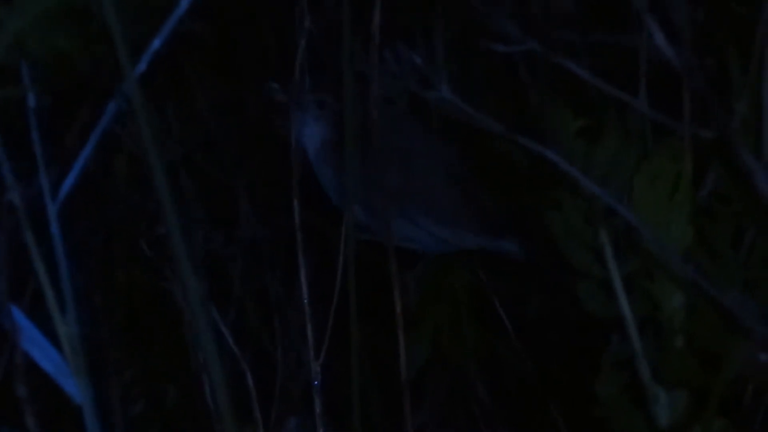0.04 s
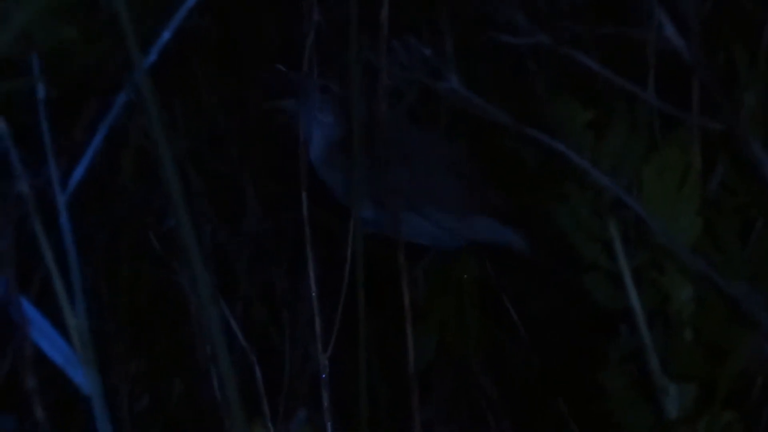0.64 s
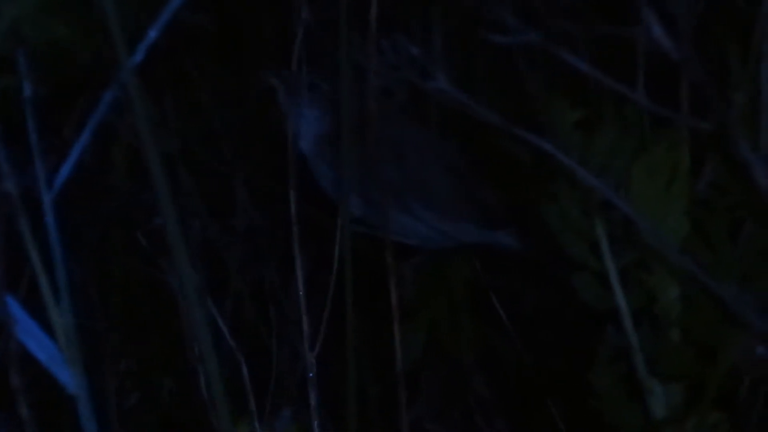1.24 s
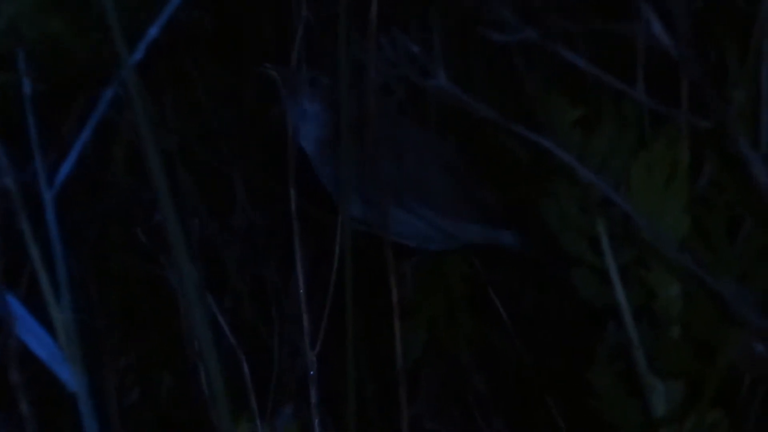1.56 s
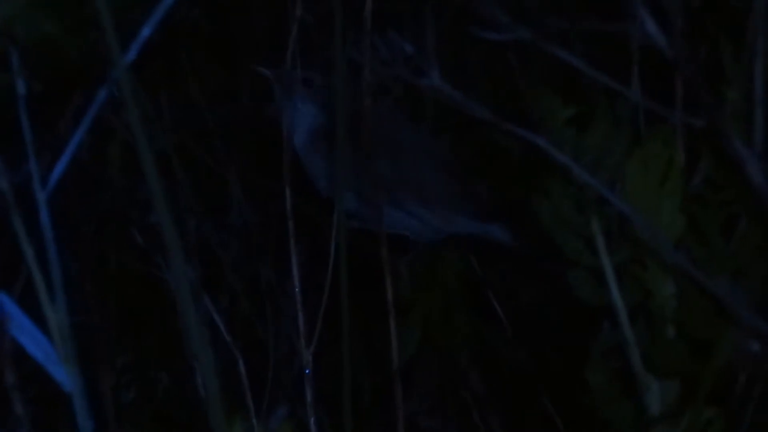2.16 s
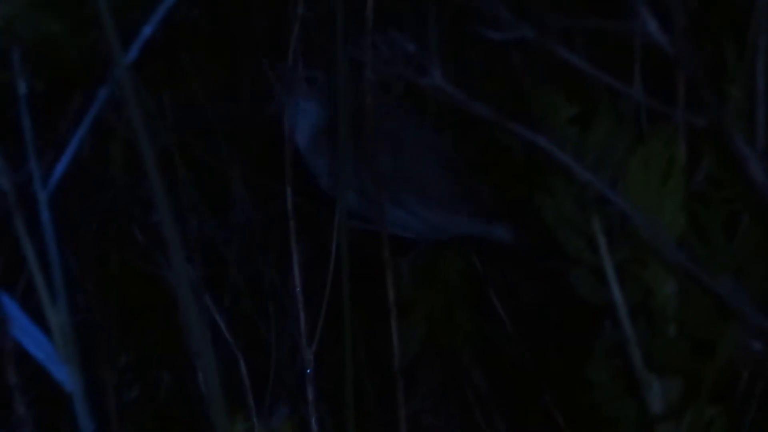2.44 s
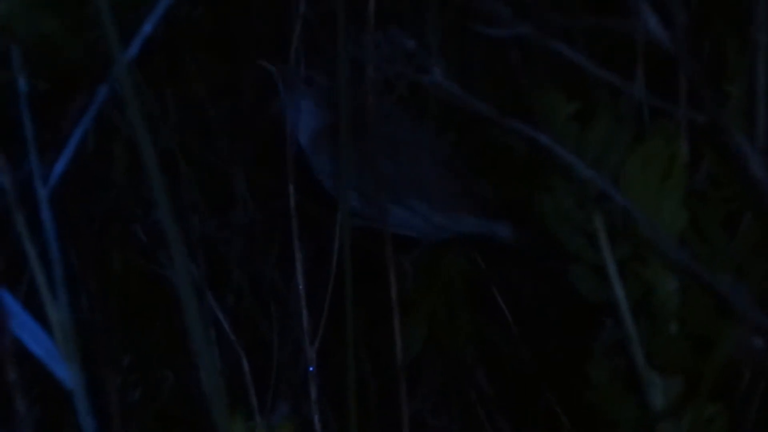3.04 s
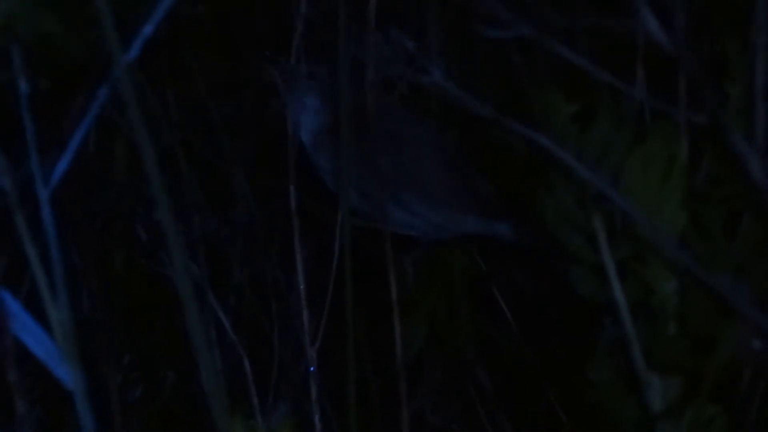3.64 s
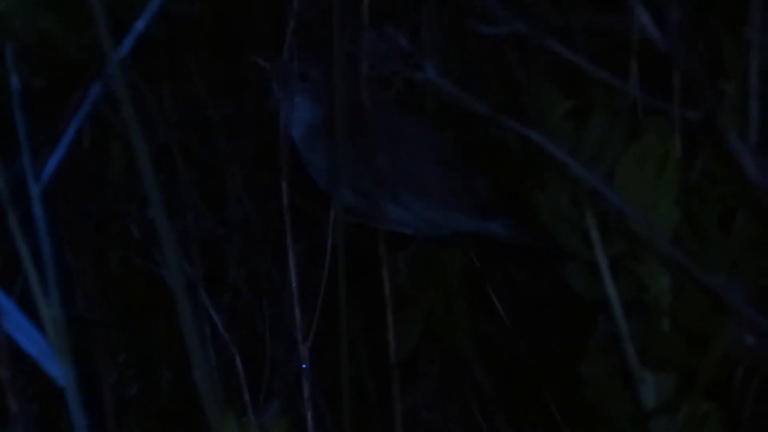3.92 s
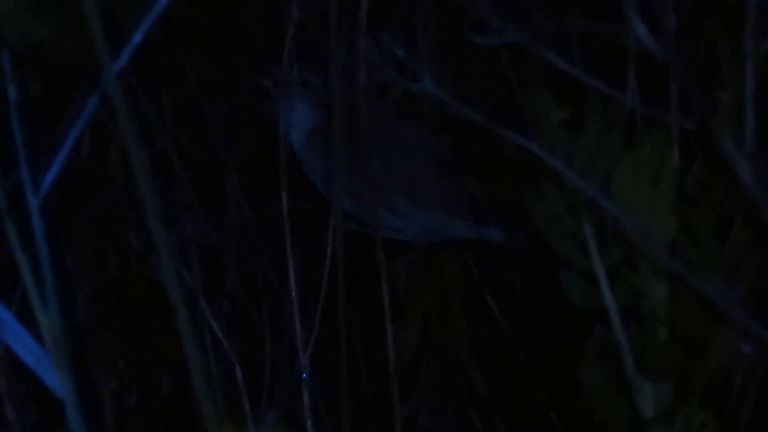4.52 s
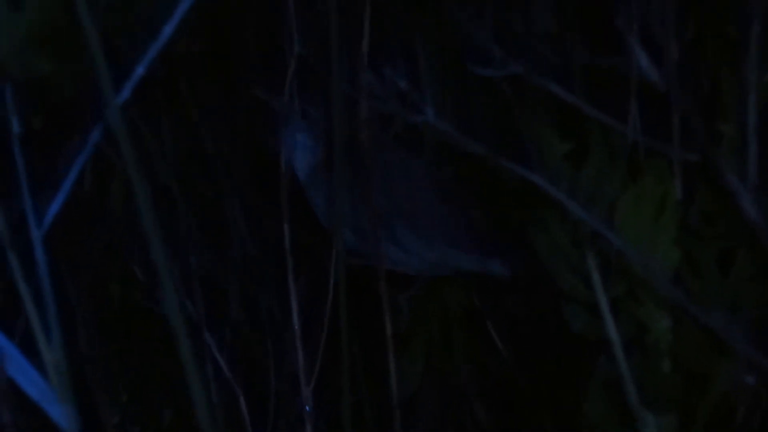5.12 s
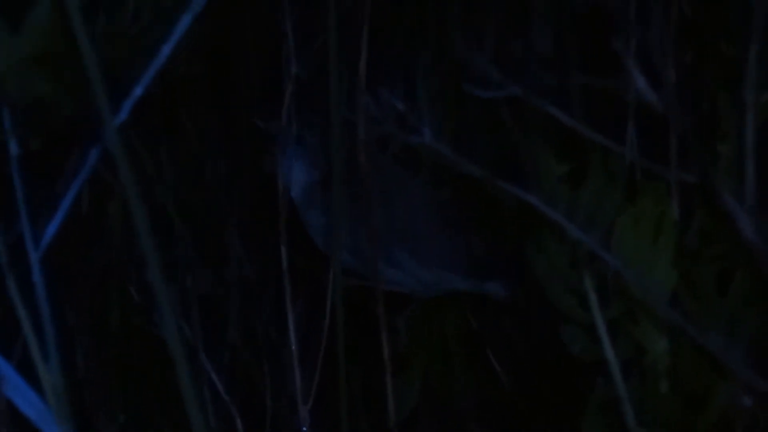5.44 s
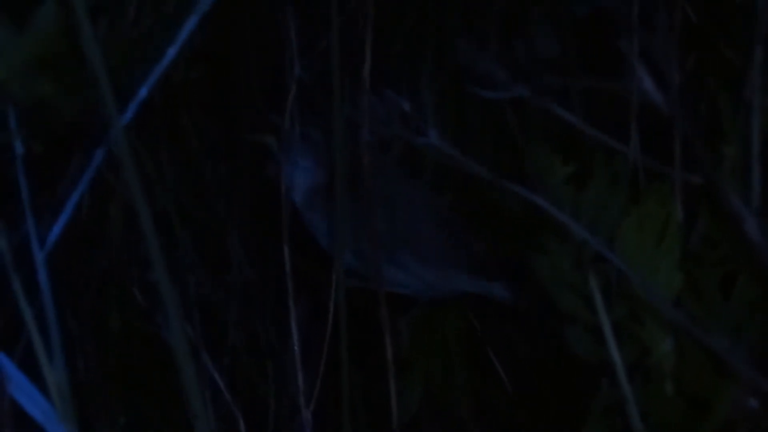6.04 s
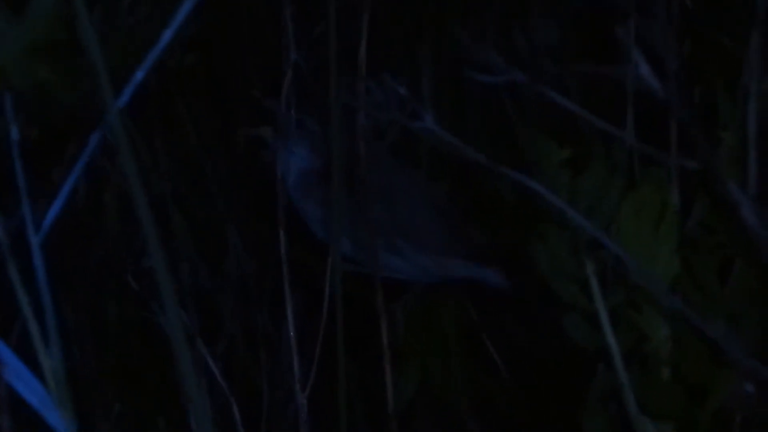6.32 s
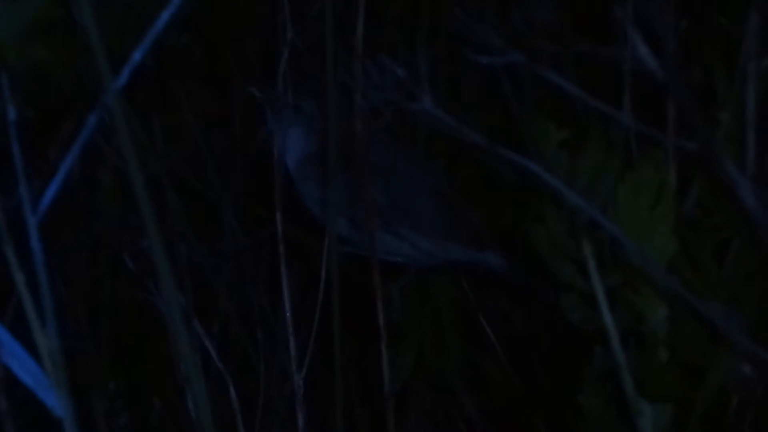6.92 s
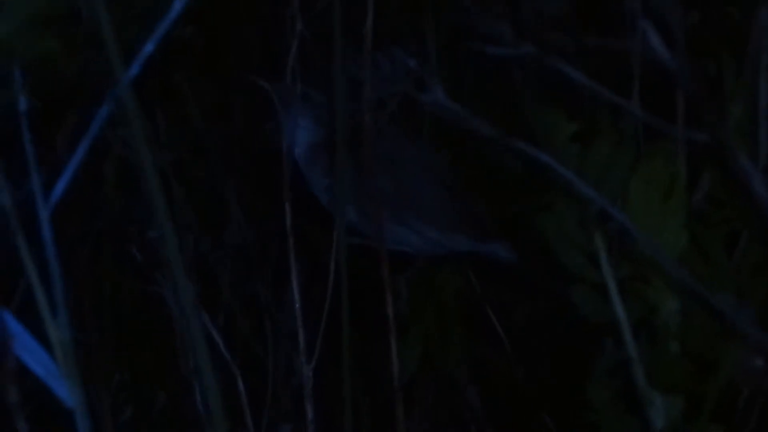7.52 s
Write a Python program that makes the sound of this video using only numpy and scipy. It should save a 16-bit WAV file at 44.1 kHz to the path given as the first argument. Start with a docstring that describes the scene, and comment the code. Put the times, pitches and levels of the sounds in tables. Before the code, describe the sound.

A small warbler sings close and centred in a reed bed at night. It opens with two slow rising whistles and short falling trills, then repeats bright chirps in quick groups of three. Between the groups come sets of three dry chucks and, twice, a harsh rising buzz ending in a sharp tack. The reeds add a slight echo, over faint rumbling air and far traffic.

```python
"""A reed bed at night, with a warbler singing close by. Its syrinx glides through rising whistles,
flutters into trilled slurs and harsh rising buzzes that end in a sharp tack, beats its two sides
together for chirps in threes, and pulses out dry chucks. The stems scatter a faint echo.
Far traffic rumbles and swells behind, under night air and a few thin steady tones."""
import sys
import numpy as np
from scipy import signal
from scipy.fft import rfft, irfft, next_fast_len
from scipy.io import wavfile
from scipy.ndimage import map_coordinates

SR = 44100
rng = np.random.default_rng(int(sys.argv[2]) if len(sys.argv) > 2 else 0)


def waveform_to_disk(signal):
    """Save audio, clipped to [-1, 1], as 16-bit WAV at the path in sys.argv[1]."""
    frames = np.transpose(np.atleast_2d(signal))
    scaled = np.clip(frames, -1, 1) * 32767
    samples = np.round(scaled).astype(np.int16)
    wavfile.write(sys.argv[1], SR, samples)


N = 342657


# Bright, scraping rasp: freq_hz, level_db
SCRAPE_SPECTRUM = [(1200, -41.5), (2000, -10), (2900, -6.5), (3800, -7), (5200, 3.5), (6100, -3.5),
                   (6800, -8.5), (7700, -28.5), (10700, -27.5), (12000, -35)]
# Hollow, throaty rasp: freq_hz, level_db
CLUCK_SPECTRUM = [(900, -29.5), (1600, -13.5), (2300, 5), (3100, -0.5), (3800, -12), (5000, -27),
                  (7000, -41.5), (11000, -42.5)]
# Thin, breathy fizz: freq_hz, level_db
FIZZ_SPECTRUM = [(2000, -22), (3000, -3), (5200, 5.5), (6200, -4.5), (7000, -3.5), (8500, -15.5),
                 (10500, 0.5), (12000, -19)]
# A whistle's fourth harmonic, relative to its fundamental: pitch_hz, level_db
FOURTH_HARMONIC = [(2200, -54.5), (2450, -54.5), (2620, -43.5), (2730, -53)]
# Slow rising whistles: start_s, length_s, plateau_hz, crest_hz, to_crest_s, climb_s, level_db
WHISTLES = [(0.106, 0.458, 1987, 2713, 0.425, 0.11, -16.5), (1.501, 0.4494, 1988, 2720, .42, 0.085, -16.5)]

def whistles(scoop_hz=789, scoop_s=.044, throat_hz=3535, throat_width_hz=330, waver_db=2):
    """The throat passes 2.5-4 kHz: the octave leads, then the fundamental takes over as pitch climbs."""
    out = np.zeros(N)
    for start, length, plateau_hz, crest_hz, crest_s, climb_s, db in WHISTLES:
        t = clock(length)
        n = len(t)
        climb = np.exp(-abs((t - crest_s) / climb_s) ** 1.7)
        hz = plateau_hz - scoop_hz * np.exp(-t / scoop_s) + (crest_hz - plateau_hz) * climb
        unsettled = np.exp(-t / .075)  # the note creaks before it turns pure
        phase = turns(hz * (1 + (.0045 + .018 * unsettled) * wobble(n, 220)))
        handover, octave_fade = ramp(t, .14, .32), ramp(t, .16, .39)
        first_db = db - 15.5 * (1 - handover) + 6.5 * (climb - 1)
        throat_db = 8 * hump(2 * hz - throat_hz, throat_width_hz)  # the octave crosses a resonance
        octave_db = db - 20 - 28 * octave_fade + throat_db
        creak_db = 21.5 * hump(t - .021, .01)  # upper harmonics flare on the attack
        third_db = octave_db - 30.5 + creak_db
        fourth_db = np.maximum(first_db + along(FOURTH_HARMONIC, hz), octave_db - 51.5 + 1.87 * creak_db)
        fifth_db = np.maximum(octave_db - 42, db - 58.5 - 25 * climb)
        overtones_db = [level + waver_db * wobble(n, 80)
                        for level in (octave_db, third_db, fourth_db, fifth_db)]
        voice = envelope(t, .057, .016) ** 2 * tone(phase, [first_db + .5 * wobble(n, 82)])
        voice += envelope(t, .029, .04) * tone(phase, [-np.inf] + overtones_db)
        scrape = amp(db - 27) * spike(t - .018, .019, .0087) * noise(SCRAPE_SPECTRUM)[:n]
        rasp = amp(db - 34) * spike(t - .035, .014, .16) * noise(CLUCK_SPECTRUM)[:n]
        closing_wisp = amp(-56 - 1200 * abs(t - length + .007)) * noise(FIZZ_SPECTRUM)[:n]
        add(out, start, voice + scrape + rasp + closing_wisp)
    return out


# Crisp hiss on chirps and tacks: freq_hz, level_db
HISS_SPECTRUM = [(900, -47), (1700, -20), (2400, -8.5), (4000, 3), (5900, -1.5), (6800, -3), (8000, -16),
                 (10700, -23.5), (12000, -38.5)]
# Runs of arching chirps: start_s, to_crest_s, length_s, crest_hz, level_db
CHIRPS = [(1.028, 0.0068, 0.051, 4160, -19.5), (1.115, 0.007, 0.049, 4193, -14.5),
          (1.207, 0.0069, 0.044, 4120, -14), (2.707, 0.013, 0.052, 4166, -17),
          (2.803, 0.014, 0.055, 4192, -15), (2.905, 0.011, 0.057, 4163, -14.5),
          (3.648, 0.0094, 0.056, 4153, -16), (3.734, .015, 0.06, 4218, -14.5),
          (3.832, .014, 0.059, 4210, -14.5), (4.551, 0.01, 0.058, 4220, -15),
          (4.642, 0.016, 0.063, 4252, -14.5), (4.74, 0.011, 0.053, 4202, -13.5),
          (5.556, 0.012, 0.054, 4004, -15.5), (5.642, .015, 0.059, 4270, -14.5),
          (5.739, 0.016, 0.063, 4195, -14.5), (6.605, 0.012, 0.06, 4148, -16),
          (6.695, 0.015, 0.06, 4240, -15), (6.789, 0.014, 0.06, 4232, -14), (7.58, 0.011, 0.057, 4054, -15),
          (7.668, 0.016, 0.063, 4205, -15)]

def chirps(arch_depth=.225, rise_s=.008, fall_s=.018, partner_ratio=.83, upturn=.032, rough=.042):
    """A clean upward arch falls and roughens as the other side of the syrinx beats against it."""
    out = np.zeros(N)
    for start, crest_s, length, hz, db in CHIRPS:
        t = clock(length)
        n, progress = len(t), t / length
        arch = 1 - arch_depth * (1 - hump(t - crest_s, np.where(t < crest_s, rise_s, fall_s)))
        joined, ending = ramp(progress, .32, .59), ramp(progress, .72, .99)
        lead = amp(-1) * ramp(progress, 0, .41) * (1 - ramp(progress, .53, .87))
        partner = amp(-5) * joined * (1 - .93 * ending)
        lead_hz = hz * arch * (1 + rough * (.09 + joined) * wobble(n, 600))
        partner_hz = hz * (partner_ratio + upturn * ending) * (1 + .024 * wobble(n, 380))
        voice = lead * tone(turns(lead_hz), [0, -42 + 3 * wobble(n, 460), -59])
        voice += partner * tone(turns(partner_hz), [.5 * wobble(n, 350), -37, -49])
        fizz = np.maximum(lead, partner) * amp(-41.5 + 3.2 * joined) * noise(FIZZ_SPECTRUM)[:n]
        opening = amp(-31 - 510 * abs(t - .004)) * noise(HISS_SPECTRUM)[:n]
        add(out, start, amp(db) * (voice + fizz + opening))
    return out


def trill(hz, gain, rasp, rate_hz, swing_hz, cusp, throb_db, lag_rad,
          jitter, wander, rough, grit, blur_hz):
    """A fast, uneven flutter of the syrinx swings pitch and loudness together and chops the rasp."""
    n = len(hz)
    cycle = turns(rate_hz * (1 + jitter * wobble(n, 260)))
    depth = 1 + .13 * wobble(n, rate_hz)
    flutter = depth * (np.sin(cycle) + cusp * np.cos(2 * cycle))  # cusp > 0: round crests, sharp dips
    pitch = hz * (1 + wander * wobble(n, 330)) + swing_hz * flutter
    throb = unit(amp(throb_db * np.sin(cycle - lag_rad) + .8 * wobble(n, 300)))  # peaks on the way down
    hoarse = (rough * np.minimum(rasp, gain) + grit * gain) * (1 - .5 * np.sin(cycle))  # most in the dips
    croak = hoarse * wobble(n, 1300) * tone(turns(.9 * pitch), [0])  # a noisy band just under the tone
    octave = tone(2 * turns(pitch + blur_hz * wobble(n, 2200)), [-32])
    voice = gain * (tone(turns(pitch), [0]) + octave)
    return throb * (voice + croak + rasp * noise(SCRAPE_SPECTRUM)[:n])


# Trilled falling slurs: start_s, length_s, start_pitch_hz, level_db
SLURS = [(0.619, .082, 5214, -17), (2.012, 0.081, 5250, -16.5), (2.381, 0.079, 5440, -17.5)]

def slurs(sag_hz_per_s=10500):
    """A trill that opens with a puff of rasp, swells and sags in pitch."""
    out = np.zeros(N)
    for start, length, hz, db in SLURS:
        t = clock(length)
        gain = envelope(t, attack_s=.032, release_s=.023)
        rasp = amp(-22) * hump(t - .005, .0085) + amp(-46) * gain
        slur = trill(hz - sag_hz_per_s * t, gain, rasp, rate_hz=191, swing_hz=370, cusp=.1, throb_db=2.4,
                     lag_rad=1.1, jitter=.013, wander=.014, rough=.2, grit=.015, blur_hz=90.3)
        add(out, start, amp(db) * slur)
    return out


# Two coughs of rasp that open each buzz: offset_s, relative_db
BUZZ_COUGHS = [(.01, -6), (.032, -9.5)]
# Harsh rising buzzes: start_s, length_s, start_pitch_hz, level_db
BUZZES = [(4.022, 0.2734, 3915, -20), (6.026, 0.2802, 3893, -19.5)]

def buzzes(hold_s=.07, rise_hz_per_s=7530, swell_db_per_s=48, full_s=.19, clearing_s=.15):
    """A trill that starts as rasp and grows higher, louder and clearer."""
    out = np.zeros(N)
    for start, length, hz, db in BUZZES:
        t = clock(length)
        pitch = hz + rise_hz_per_s * np.maximum(t - hold_s, 0)
        swell = amp(swell_db_per_s * np.minimum(t - full_s, 0))
        gain = envelope(t, attack_s=.069, release_s=.03) * swell
        rasp = amp(-12) * hump(t, clearing_s) * ramp(t, 0, .01)
        rasp += sum(amp(cough_db) * hump(t - at, .0059) for at, cough_db in BUZZ_COUGHS)
        buzz = trill(pitch, gain, rasp, rate_hz=173, swing_hz=470, cusp=-.11, throb_db=2,
                     lag_rad=.38, jitter=.05, wander=.022, rough=1.1, grit=.027, blur_hz=222)
        add(out, start, amp(db) * buzz)
    return out


# The sharp tack that caps each buzz: start_s, pitch_hz, level_db
TACKS = [(4.356, 5980, -14.5), (6.3695, 5950, -14)]

def tacks(peak_s=.0035, decay_s=.0062, broken_s=.0052, rough=.055):
    """A tack starts pure and breaks into rasp."""
    out, t = np.zeros(N), clock(.035)
    n = len(t)
    broken = ramp(t, peak_s / 2, broken_s)
    for start, hz, db in TACKS:
        phase = turns(hz * (1 + rough * broken * wobble(n, 700)))
        voice = spike(t - peak_s, .0007, decay_s) * tone(phase, [-1, -41])
        rasp = amp(-8 + wobble(n, 601)) * broken * hump(t - .009, .011) * noise(HISS_SPECTRUM)[:n]
        add(out, start, amp(db) * (voice + rasp))
    return out


# A chuck's weak pulse and strong pulse: offset_s, pitch_ratio, relative_db
CHUCK_PULSES = [(-.0125, .83, -8), (0, 1, 1.5)]
# Dry chucks: centre_s, pitch_hz, level_db
CHUCKS = [(3.0955, 2700, -18), (3.285, 2380, -20), (3.465, 2390, -19), (4.9425, 2534, -19.5),
          (5.1409, 2410, -22.5), (5.365, 2505, -21), (7.0062, 2700, -19.5), (7.198, 2680, -22),
          (7.4035, 2660, -20)]

def chucks(fall_depth=.42, fall_s=.005, rough=.026):
    """Two falling pulses, each trailing a burst of rasp, inside a faint cloud of rasp."""
    out, t = np.zeros(N), clock(.07) - .035
    n = len(t)
    for centre, hz, db in CHUCKS:
        voice, rasp = np.zeros(n), amp(-18) * hump(t, .02)
        for at, ratio, pulse_db in CHUCK_PULSES:
            sweep = ratio * (1 - fall_depth * np.tanh((t - at) / fall_s))
            phase = turns(hz * sweep * (1 + rough * wobble(n, 700)))
            voice += spike(t - at, .0017, .0017) * tone(phase, [pulse_db, pulse_db - 39])
            rasp += amp(pulse_db - 4) * spike(t - at - .003, .0011, .0035)
        sputter = unit(amp(1.5 * wobble(n, 601)))
        add(out, centre + t[0], amp(db) * (voice + rasp * sputter * noise(CLUCK_SPECTRUM)[:n]))
    return out


# The reed bed's tail, shorter in the treble: freq_hz, t60_s
REED_DECAY = [(1500, 0.37), (2700, .3), (4500, 0.27), (10000, 0.22)]

def reed_bed(song, near_db=-18, near_t60_s=.09, far_db=-27, spread=.45):
    """Near stems scatter the song at once; the wider bed answers with a faint tail."""
    hz, t, spectra = signal.stft(rng.standard_normal((2, SR // 2)), SR, nperseg=256)
    far = signal.istft(spectra * amp(-60 * t / along(REED_DECAY, hz)[:, None]), SR, nperseg=256)[1]
    near = rng.standard_normal(far.shape) * amp(-60 * np.arange(far.shape[1]) / SR / near_t60_s)
    echo = amp(near_db) * near / np.linalg.norm(near[0]) + amp(far_db) * far / np.linalg.norm(far[0])
    delayed = np.pad(song, (80, 0))
    mid, side = signal.fftconvolve(delayed[None], echo, axes=1)[:, :N]
    return np.array([mid + spread * side, mid - spread * side])


# Distant tyre wash: freq_hz, level_db
TYRE_SPECTRUM = [(300, -31), (600, 0), (1050, 3), (1500, -3.5), (2300, -8), (3500, -40.5)]
# Swells of passing traffic: peak_s, half_length_s, level_db
TRAFFIC_SWELLS = [(1.096, .9, -53), (3.702, 0.6, -50), (4.392, 0.18, -47), (5.8, 0.94, -53.5),
                  (7.085, 0.31, -47)]

def far_traffic(murmur_db=-58):
    """Tyre noise swells over a steady murmur."""
    t = np.arange(N) / SR
    swell_power = sum(amp(db) ** 2 * hump(t - peak, width) for peak, width, db in TRAFFIC_SWELLS)
    return np.sqrt(amp(murmur_db) ** 2 + swell_power) * wide(TYRE_SPECTRUM)


# Dark, rumbling bed of air: freq_hz, level_db
AIR_SPECTRUM = [(25, -17.5), (38, -12), (55, -0.5), (80, -4), (140, -4), (190, -7), (360, -1.5), (520, -3),
                (750, -10), (1550, -15), (2100, -17), (3100, -24.5), (4100, -32.5), (7500, -38.5),
                (11000, -41)]

def night_air(level_db=-47):
    """A low wash whose level drifts gently."""
    return amp(level_db + 1.3 * wobble(N, 3.6)) * wide(AIR_SPECTRUM)


# Faint distant tones: pitch_hz, level_db
HUM_TONES = [(58, -60), (490, -66), (1204, -68.5), (1685, -62.5)]

def distant_hum():
    """Steady sines waver slightly in pitch and level."""
    return sum(tone(turns(hz + 2 * wobble(N, 8.2)), [db + 2 * wobble(N, 4.3)]) for hz, db in HUM_TONES)


# Thin whines in the hiss: centre_hz, width_hz, level_db
WHINE_BANDS = [(3620, 59, -74.5), (5850, 90, -79.5), (8680, 70, -85)]

def whines():
    """Narrow bands of noise hold a faint high pitch."""
    skirt = [(-4, -70), (-1, -10), (0, 0), (1, -10), (4, -70)]  # widths_from_centre, level_db
    return sum(amp(db) * wide([(hz + step * width, drop) for step, drop in skirt])
               for hz, width, db in WHINE_BANDS)


# Stereo width of the ambience: freq_hz, side_db
STEREO_WIDTH = [(40, -31), (150, -23), (600, -16), (1500, -13), (4000, -5.5), (10000, -4.5)]

def wide(spectrum):
    """Stereo noise, near mono in the bass."""
    mid = noise(spectrum, size=N)
    side = filtered(noise(spectrum, size=N), lambda hz: amp(along(STEREO_WIDTH, hz)))
    return np.array([mid + side, mid - side])


def amp(db):
    """Decibels to gain."""
    return 10 ** (np.asarray(db) / 20)


def unit(x):
    """Scale to rms 1."""
    return x / np.sqrt(np.mean(x ** 2) + 1e-20)


def along(points, hz):
    """Read a (freq_hz, value) curve on a log frequency axis."""
    freqs, values = np.transpose(points)
    return np.interp(np.log(hz + 1), np.log(freqs + 1), values)


def wobble(n, rate):
    """A smooth random curve, rate knots a second."""
    return map_coordinates(rng.standard_normal(2048), [np.arange(n) * rate / SR], mode="wrap")


def filtered(x, response):
    """EQ x with a gain given as a function of frequency."""
    n = x.shape[-1]
    size = next_fast_len(n + 4096)
    return irfft(rfft(x, size) * response(np.fft.rfftfreq(size, 1 / SR)), size)[..., :n]


def noise(spectrum, size=32768):
    """Coloured noise of rms 1."""
    return unit(filtered(rng.standard_normal(size), lambda hz: amp(along(spectrum, hz))))


def turns(hz):
    """Running phase of a moving frequency, in radians."""
    return 2 * np.pi * np.cumsum(hz) / SR


def tone(phase, levels_db):
    """Harmonics 1, 2, .. at the given rms levels."""
    return np.sqrt(2) * sum(amp(db) * np.sin((k + 1) * phase) for k, db in enumerate(levels_db))


def add(track, start_s, sound):
    """Mix a sound in with 2 ms fades."""
    part = track[round(start_s * SR):][:len(sound)]
    edge_s = np.minimum(np.arange(len(sound)), np.arange(len(sound))[::-1]) / SR
    part += (sound * np.minimum(edge_s / .002, 1))[:len(part)]


def clock(length):
    """Sample times from zero to length."""
    return np.arange(int(length * SR)) / SR


def ramp(t, start, end):
    """A smooth step from 0 at start to 1 at end."""
    return np.sin(np.pi / 2 * np.clip((t - start) / (end - start), 0, 1)) ** 2


def envelope(t, attack_s, release_s):
    """Attack, hold, and a release that ends with t."""
    return ramp(t, 0, attack_s) * ramp(t[-1] - t, 0, release_s)


def hump(t, width):
    """A bell curve around t = 0."""
    return np.exp(-(t / width) ** 2)


def spike(t, rise_s, decay_s):
    """An exponential rise to t = 0 and decay after it."""
    return np.exp(np.minimum(t / rise_s, -t / decay_s))


def scene():
    """The bird sits close and centred, with echo and ambience spread around it."""
    song = whistles() + slurs() + buzzes() + chirps() + chucks() + tacks()
    return song + reed_bed(song) + night_air() + far_traffic() + distant_hum() + whines()


# Left-right colour of the two microphone ports: freq_hz, left_minus_right_db, left_lead_rad
MIC_PORTS = [(100, -0.5, 0.1), (600, 1, -.07), (1500, 1.5, -.02), (2700, -1.3, .04), (3630, 0, 0.18),
             (4300, -3, 0.13), (5000, -0.7, 0.14), (6000, 1.5, .19), (7300, 3, .15), (10000, 1, .1)]

def record(dry, cutoff_hz=11080):
    """Two microphone ports skew gain and phase a little; a steep low-pass shuts off the top."""
    def ports(hz):
        at_hz, tilts_db, leads = np.transpose(MIC_PORTS)
        tilt_db, lead = np.interp(hz, at_hz, tilts_db), np.interp(hz, at_hz, leads)
        left = amp(tilt_db / 2) * np.exp(1j * lead / 2)
        return np.array([left, 1 / left])
    return filtered(filtered(dry, ports), lambda hz: 1 / np.sqrt(1 + (hz / cutoff_hz) ** 200))


dry = scene()
out = record(dry)
waveform_to_disk(out)
```